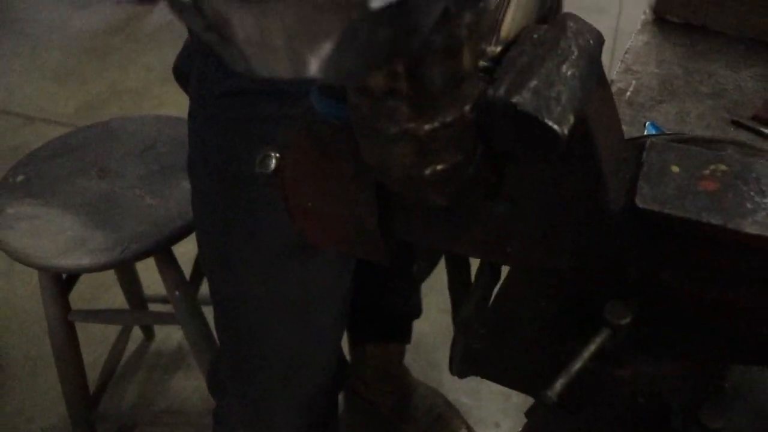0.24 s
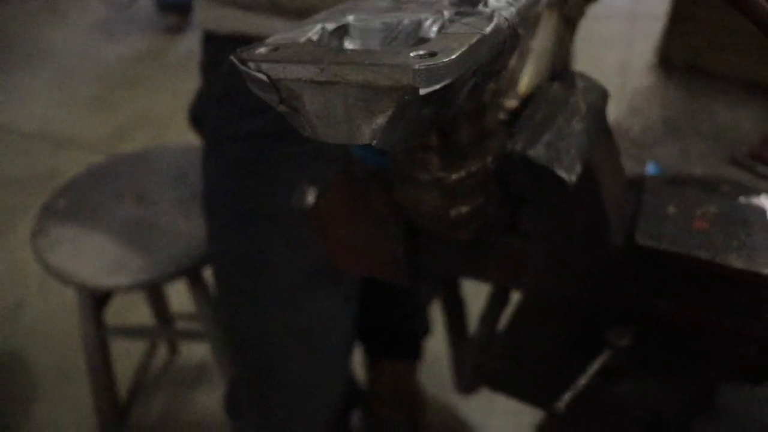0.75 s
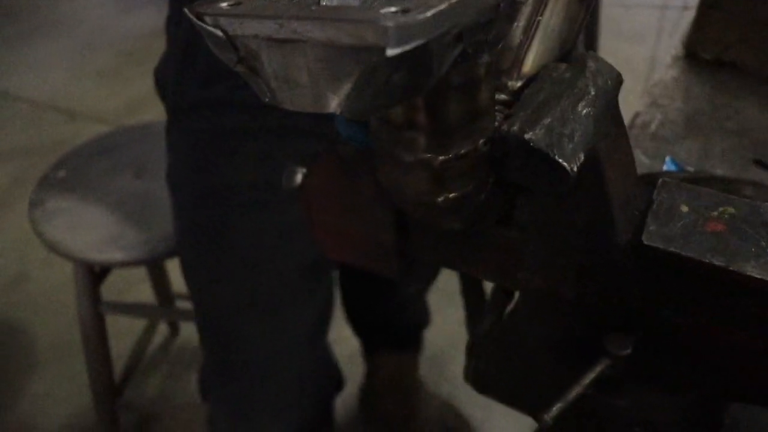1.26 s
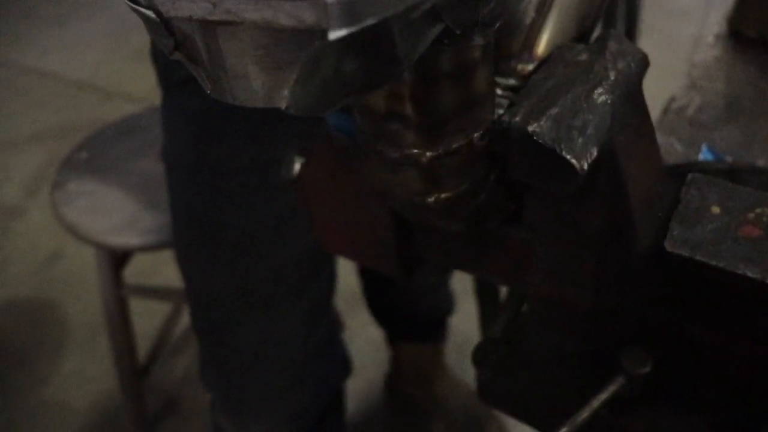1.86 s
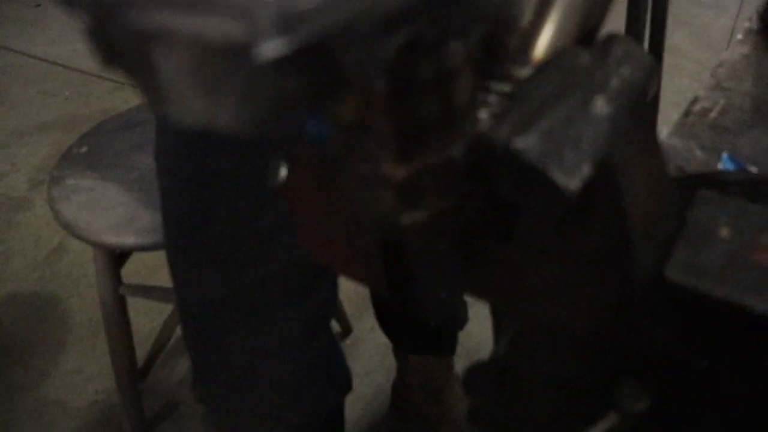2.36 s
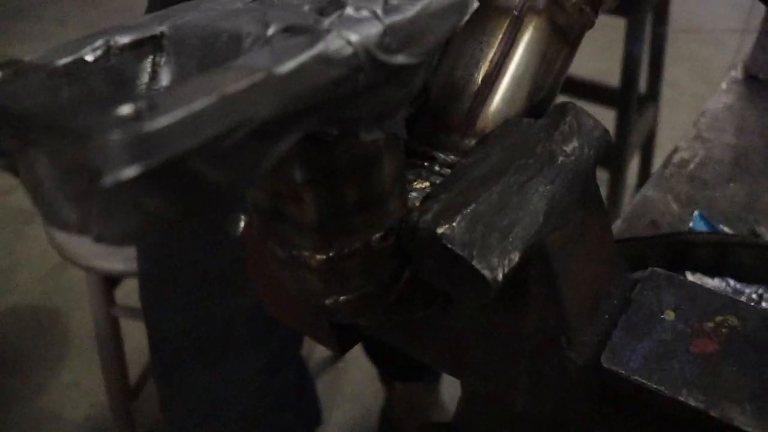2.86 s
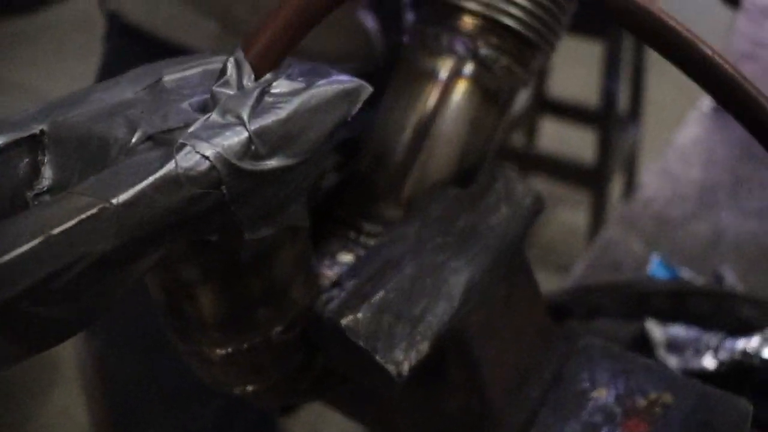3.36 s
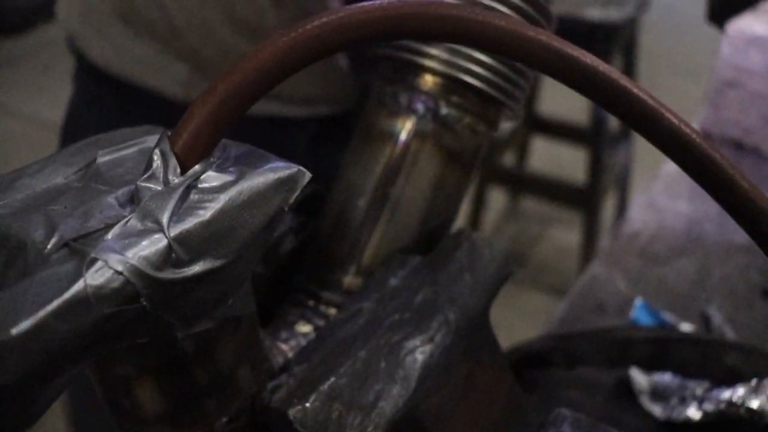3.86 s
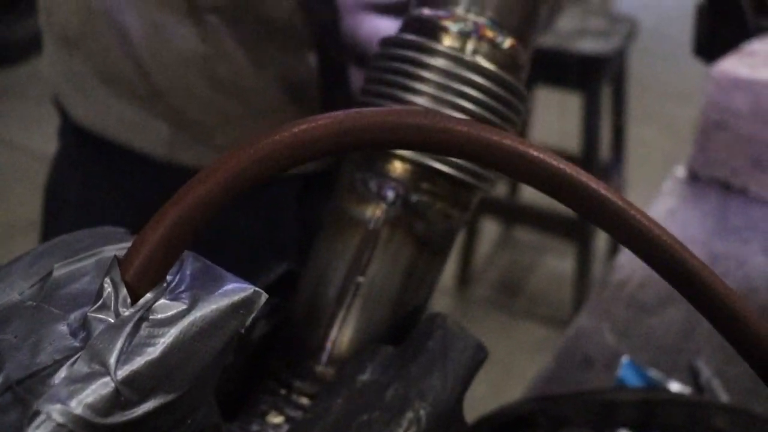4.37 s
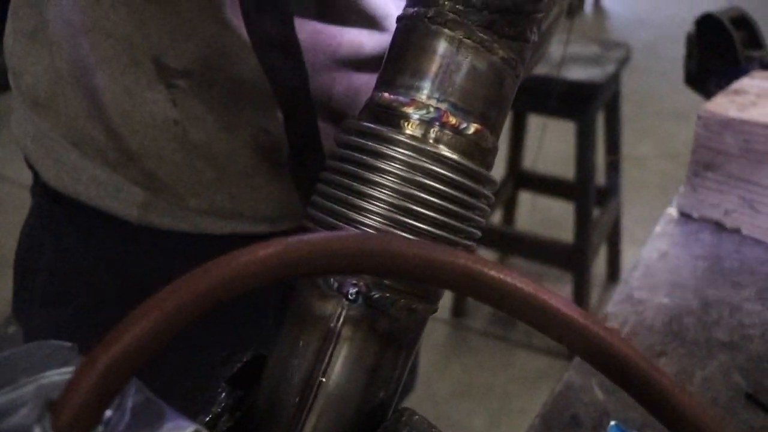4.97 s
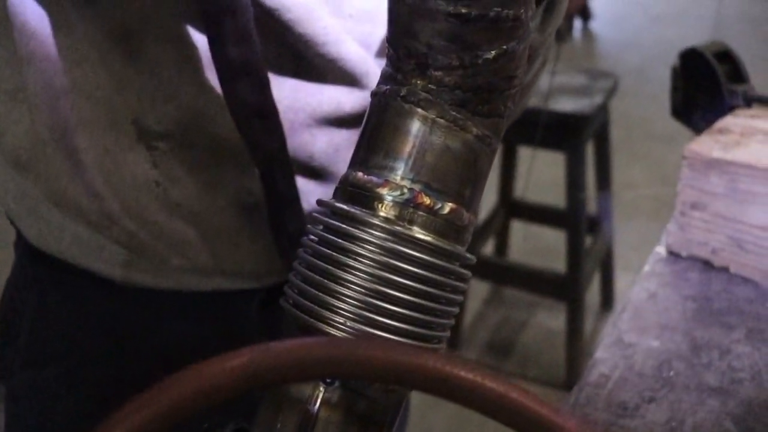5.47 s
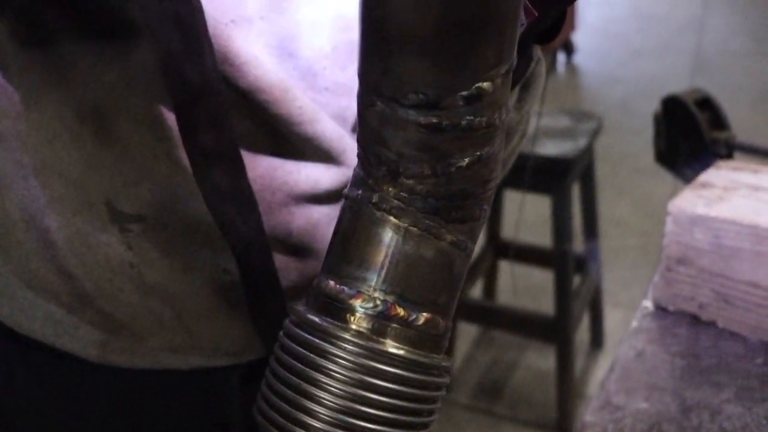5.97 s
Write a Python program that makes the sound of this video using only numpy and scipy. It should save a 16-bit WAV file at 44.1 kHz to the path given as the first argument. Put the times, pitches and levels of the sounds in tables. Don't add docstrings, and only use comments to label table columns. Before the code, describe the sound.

Low workshop machine hum with small clicks, then a loud harsh electrical buzz for a third of a second, followed by steady bright gas hiss.

```python
import sys
import numpy as np
from scipy import signal
from scipy.fft import rfft, irfft
from scipy.io import wavfile
from scipy.ndimage import uniform_filter1d, map_coordinates

SR = 44100
rng = np.random.default_rng(int(sys.argv[2]) if len(sys.argv) > 2 else 0)


def dump(signal):
    limited = np.clip(np.atleast_2d(signal).T, -1, 1)
    pcm = np.round(limited * 32767).astype(np.int16)
    wavfile.write(sys.argv[1], SR, pcm)


def magnitude_from_level(level_db):
    exponent = np.asarray(level_db, float) / 20
    return 10 ** exponent


N = 274302

# time_s, rise_db
FLARES = [(2.551, 2.5), (2.718, 2), (2.82, 1.5)]
# freq_hz, density_db_per_hz
GAS_FAR = [(1180, -24), (2000, -21), (2340, -7.5), (3270, 1), (4900, -22), (6080, -4.5), (8440, -4.5),
           (10600, -21), (12100, -6.5), (15700, -23)]
GAS_NEAR = [(1180, -14), (2000, 3), (2140, -20), (2570, -4.5), (3240, -0.5), (5340, -7.5), (9120, -2),
            (10100, -6.5), (13400, -12), (15700, -21)]
# time_s, closeness_0_to_1
NEARNESS = [(2.47, 0.84), (3.0, .65), (3.7, 0.43), (5.6, 0.92), (6.22, 1)]
# start_s, length_s, start_hz, level_db
GLINTS = [(2.96, 0.62, 6400, 6.5), (2.86, .5, 7700, 3), (2.9, .35, 12200, 5), (3.1, .35, 10100, 5),
          (3.3, 0.68, 8660, 8), (3.3, .65, 13500, 6), (3.3, .55, 11900, 4), (3.45, .45, 10000, 13),
          (3.5, .6, 7100, 8.5), (3.95, 0.53, 8700, 7.5), (4.2, 0.67, 6500, 9.5), (4.1, .6, 11400, 7),
          (4.15, .55, 12900, 6), (4.4, .5, 8850, 4), (4.7, .6, 13800, 7), (4.78, 1.15, 9530, 7),
          (4.85, .55, 8950, 5.5), (5.06, .8, 10900, 6), (5.6, .5, 6500, 5), (5.4, .55, 8900, 3),
          (5.5, .6, 13900, 6), (4.6, 1.4, 3830, 3), (5.75, 0.68, 3350, 5.5), (3, .55, 11000, -8),
          (4.9, .9, 10600, -9), (4.3, .7, 12100, -3), (3.9, 1.4, 15300, -5), (2.7, .2, 8800, -9)]
# extra_path_m, growth_m_per_s, share
ECHOES = [(.21, .012, 0.11), (.43, 0.0305, 0.12), (.66, .05, .2), (.95, 0.0586, .15)]
# freq_hz, level_db
TICK_COLOUR = [(1500, -28), (3000, 0.5), (5000, -1), (9000, 1.5), (10700, -5), (13000, -1), (16000, -5)]
# freq_hz, level_db, t60_s
HOSE_CLIP = [(13000, -2, .035), (8500, -8, 0.048)]
SWITCH_DOWN = [(2800, -1, .03), (3540, -1.5, 0.055), (6360, -7, .04), (9000, 1, 0.031)]
SWITCH_UP = [(3700, -1, 0.026), (4450, 1.5, 0.028), (4860, -4.5, .023), (6500, -16, .06), (8500, -7, .03),
             (13300, -8, .04)]
VALVE = [(2230, -4, 0.13), (4780, -2, .06), (6600, 0, 0.068), (13000, -6, 0.051)]
# time_s, peak_db, crack_to_ring_db
TAPS = [
    (HOSE_CLIP, [(.469, -55, 12), (.485, -64, 6), (.493, -51, 3), (.763, -55, -3), (1.763, -50, 9), (2.413, -40, 5)]),
    (SWITCH_DOWN, [(1.1635, -30, 5), (1.178, -38, 4)]),
    (SWITCH_UP, [(1.2208, -28, -1), (1.234, -35, 2)]),
    (VALVE, [(2.427, -48, -8), (2.4327, -29, 5)]),
]
# start_s, length_s, level_db
RUBS = [(1.755, 0.068, -48), (1.81, 0.063, -53.5), (1.872, 0.058, -51), (1.909, 0.077, -50.5)]
# time_s, change_db
LURCHES = [(.47, -11), (.85, -4), (1.9, 3), (2.2, -4.5), (4.9, 3), (5.85, -6)]
# start_s, length_s, level_db
WHINES = [(.03, 0.32, -47), (1.08, 1.8, -48.5), (3.068, 1.5, -43)]
# multiple, level_db
FAN_ORDERS = [(3, -44.5), (8, -56.5), (9, -60.5), (11, -70), (12, -54.5), (14, -64), (17, -72), (18, -64),
              (27, -69)]
# freq_hz, width_hz, level_db, steadiness_0_to_1
DRONES = [(120.6, 1.9, -49, 1), (225.6, 1.9, -56, 0.9), (459, 17, -45, 0.42), (603, 6.6, -59, 0.34),
          (4045, 19, -67.5, 0.34)]
# freq_hz, density_db_per_hz
SHOP_COLOUR = [(20, -34), (60, -32.5), (95, -32), (135, -9), (200, -15.5), (270, -14), (330, -9.5),
               (480, -11.5), (620, -13.5), (1350, -20.5), (1600, -23), (4000, -37.5), (7100, -41),
               (16000, -60)]
# freq_hz, width_hz, level_db
SHOP_HOLLOWS = [(377, 41, -47), (414, 46, -46.5), (488.7, 26, -50), (1320, 204, -50.5)]
# freq_hz, density_db_per_hz
STAGE_HISS = [(7000, -25), (9500, -2), (11000, 0), (16000, 0)]

MAINS_HZ, MAINS_ZERO_S, STARTER_ON_S, STARTER_OFF_S = 59.95, 2.5306, 2.5306, 2.9058
POINTED = 0.5
WEAK_DB, COLD_DB, WARM_S = -11, -28, 0.028
FLARE_S = 0.015
VALVE_S, FLOW_DB, SURGE_DB, SURGE_S = 2.4325, -50.5, 12.5, 0.97
GLINT_SLIDE_PER_S, GLINT_WIDTH_HZ = 0.068, 190
PUMP_HZ, FAN_HZ, WHINE_HZ = 75.95, 116.8, 1372
SECOND_DB, SECOND_SWAY_DB, LURCH_S = -39, 0.93, 0.053
FOURTH_DB, FOURTH_SWAY_DB, FOURTH_SINK_DB_PER_S = -39, 2, -2.5
WHINE_RISE_S, WHINE_FADE_DB, WHINE_IDLE_DB = 0.036, -10, -65
RUMBLE_SINK_DB_PER_S = -0.44
STAGE_DB, EDGE_HZ = -78, 15800


def evened(x):
    return x / np.sqrt(np.mean(x ** 2) + 1e-20)


def read(points, hz):
    f, value = np.transpose(points)
    return np.interp(np.log(hz + 1), np.log(f + 1), value)


def drift(hz):
    low_pass = signal.butter(2, hz, fs=SR, output="sos")
    return evened(signal.sosfilt(low_pass, rng.standard_normal(N + SR))[SR:])


def wavering(hz, width_hz, clean):
    swing = clean + (1 - clean) * (drift(width_hz / 2) + 1j * drift(width_hz / 2))
    return evened((swing * np.exp(2j * np.pi * hz * np.arange(N) / SR)).real)


def airy(colour_db, patchy_db, wide_bins, long_frames, slide_per_s=0):
    frames, hz = N // 256 + 5, np.fft.rfftfreq(1024, 1 / SR)
    s = np.arange(frames) * 256 / SR
    real, imag, patches = rng.standard_normal((frames, 513, 3)).T
    for _ in range(2):
        patches = uniform_filter1d(patches, max(int(wide_bins), 1), 0)
        patches = uniform_filter1d(patches, max(int(long_frames), 1), 1)
    place, frame = np.meshgrid(np.arange(513), np.arange(frames), indexing="ij")
    moved = [place * np.exp(slide_per_s * s), frame]
    patches = evened(map_coordinates(patches, moved, order=1, mode="mirror"))
    field_db = colour_db(hz, s) + patchy_db * (patches - 0.13 * patches ** 2)
    spectra = (real + 1j * imag) * magnitude_from_level(field_db)
    return evened(signal.istft(spectra, nperseg=1024, noverlap=768)[1][:N])


def starter(t):
    sine = np.sin(2 * np.pi * MAINS_HZ * (t - MAINS_ZERO_S))
    volts = (1 - POINTED) * sine + POINTED * np.arcsin(sine) * 2 / np.pi
    enough = (abs(volts) > 0.27) | (t < STARTER_ON_S + 0.002)
    live = (t > STARTER_ON_S) & (t < STARTER_OFF_S) & enough
    gap_db = 1.7 * np.tanh(drift(2500)) + 0.9 * drift(50)
    charge = 0.985 + np.cumsum(4950 * abs(volts) * live * magnitude_from_level(-gap_db)) / SR
    at = np.flatnonzero(np.diff(np.floor(charge)))
    late = (charge[at + 1] % 1) / (charge[at + 1] - charge[at])

    flare_db = sum(db * np.exp(-((t[at] - s) / FLARE_S) ** 2) for s, db in FLARES)
    weak_db = WEAK_DB + COLD_DB * np.exp(-(t[at] - STARTER_ON_S) / WARM_S)
    weak_db = (volts[at] < 0) * (weak_db + 2.5 * drift(61)[at])
    chance_db = 3.44 * np.tanh(rng.standard_normal(N)[at])
    size = magnitude_from_level(flare_db + 0.81 * gap_db[at] + chance_db + weak_db)
    sparks = np.zeros(N + 16)
    for k in range(-7, 9):
        sparks[at + 1 + k] += size * np.sinc(k + late) * np.cos(np.pi * (k + late) / 18) ** 2

    u = np.arange(400) / SR
    snap = (u == 0) + 0.3 * np.exp(-u / 0.00018)
    keep = np.exp(-1 / (0.0021 * SR))
    lumps = signal.lfilter([1 - keep], [1, -keep], sparks)[:N]
    return magnitude_from_level(-17.0) * np.convolve(sparks, snap)[:N] + magnitude_from_level(18.5) * lumps


def low_cut(x, *corners_hz):
    for hz in corners_hz:
        x = signal.lfilter(*signal.butter(1, hz, "high", fs=SR), x)
    return x


def gas(t):
    def colour_db(hz, s):
        near = np.clip(np.interp(s, *np.transpose(NEARNESS)), 0, 1)
        field = np.outer(read(GAS_FAR, hz), 1 - near) + np.outer(read(GAS_NEAR, hz), near)
        for start, length, from_hz, db in GLINTS:
            part = np.clip((s - start) / length, 0, 1)
            centre_hz = from_hz * (1 - GLINT_SLIDE_PER_S * length * part)
            off = (hz[:, None] - centre_hz) / GLINT_WIDTH_HZ
            field += db * np.sin(np.pi * part) ** 0.21 * np.exp(-off ** 2)
        paths = 1
        for extra_m, growth, share in ECHOES:
            delay_s = (extra_m + growth * (s - VALVE_S)) / 343
            paths = paths + share * np.exp(-2j * np.pi * np.outer(hz, delay_s))
        return field + 20 * np.log10(abs(paths) + 0.01)

    opened = np.clip((t - VALVE_S) / 0.0022, 0, 1)
    flow_db = FLOW_DB + SURGE_DB * np.exp(-abs(t - VALVE_S) / SURGE_S)
    return magnitude_from_level(flow_db) * opened * airy(colour_db, 3.3, 5, 32, slide_per_s=0.09)


def taps():
    hz = np.fft.rfftfreq(8192, 1 / SR)
    u, out = np.arange(8192) / SR, np.zeros(N + 8192)
    for rings, ticks in TAPS:
        for s, db, crack_db in ticks:
            noise = rng.standard_normal(8192)
            crack = magnitude_from_level(crack_db) * evened(irfft(rfft(noise) * magnitude_from_level(read(TICK_COLOUR, hz))))
            sound = crack * (magnitude_from_level(-60 * u / rings[-1][2]) + magnitude_from_level(-32 - 60 * u / 0.2))
            rattle_s = np.cumsum(1 + 0.22 * uniform_filter1d(noise, 20)) / SR
            for ring_hz, ring_db, t60_s in rings:
                ring = np.sqrt(2) * np.sin(2 * np.pi * ring_hz * rattle_s)
                sound = sound + ring * magnitude_from_level(ring_db - 60 * u / t60_s)
            out[round(s * SR):][:8192] += magnitude_from_level(db - 8.0) * np.minimum(u / 0.00062, 1) * sound
    return out[:N]


def rustle(t):
    colour = [(1500, -8), (4500, 0), (9000, -7.5), (11000, -19), (16000, -22)]  # freq_hz, level_db
    grainy = magnitude_from_level(1.8 * drift(60))
    rub = airy(lambda hz, s: read(colour, hz)[:, None], 2.5, 12, 3.5)
    push = 0
    for s, length, db in RUBS:
        push = push + magnitude_from_level(db) * np.sin(np.pi * np.clip((t - s) / length, 0, 1)) ** 2
    return push * grainy * rub


def pump(t):
    lurch_db = sum(db * np.exp(-((t - s) / LURCH_S) ** 2) for s, db in LURCHES)
    second_db = SECOND_DB + SECOND_SWAY_DB * drift(5.6) + lurch_db
    fourth_db = FOURTH_DB + FOURTH_SINK_DB_PER_S * t + FOURTH_SWAY_DB * drift(4.4)
    shaft = magnitude_from_level(-48.5 - 0.63 * t) * np.sin(2 * np.pi * PUMP_HZ * t)
    second = magnitude_from_level(second_db) * wavering(2 * PUMP_HZ, 3.0, 0.95)
    fourth = magnitude_from_level(fourth_db) * wavering(4 * PUMP_HZ, 6.6, 0.82)
    return shaft + second + fourth


def motor_whine(t):
    load = magnitude_from_level(WHINE_IDLE_DB)
    for s, length, db in WHINES:
        rise = np.clip((t - s) / WHINE_RISE_S, 0, 1) * (t < s + length)
        load = load + rise * magnitude_from_level(db + WHINE_FADE_DB * ((t - s) / length) ** 2)
    return magnitude_from_level(-4) * load * wavering(WHINE_HZ, 4.9, 0.93)


def fan():
    return sum(magnitude_from_level(db) * wavering(k * FAN_HZ, 2.76, 0.66) for k, db in FAN_ORDERS)


def drones():
    return sum(magnitude_from_level(db) * wavering(hz, width, min(steady, 1)) for hz, width, db, steady in DRONES)


def shop(t):
    rumble = airy(lambda hz, s: read(SHOP_COLOUR, hz)[:, None], 0.4, 8, 8.4)
    hollows = sum(magnitude_from_level(db) * wavering(hz, width, 0) for hz, width, db in SHOP_HOLLOWS)
    return magnitude_from_level(0.85 + RUMBLE_SINK_DB_PER_S * t) * (magnitude_from_level(-36.5) * rumble + hollows)


def scene():
    t = np.arange(N) / SR
    buzz = starter(t)
    air = gas(t) + taps() + rustle(t) + pump(t) + motor_whine(t) + fan() + drones() + shop(t)
    return air + np.array([low_cut(buzz, 27.8, 26, 5.9), low_cut(buzz, 24.5, 25.8, 5.6)])


def top_cut(x):
    return signal.sosfilt(signal.butter(12, 16830, fs=SR, output="sos"), x)


def record(dry):
    hiss = airy(lambda hz, s: read(STAGE_HISS, hz)[:, None], 0, 1, 1)
    noisy = dry + magnitude_from_level(STAGE_DB) * hiss * np.array([[1], [-1]])
    edge = signal.firwin(401, EDGE_HZ, window=("kaiser", 7), fs=SR)
    mix = signal.oaconvolve(noisy, edge[None], "same")
    return top_cut(mix)


dry = scene()
out = record(dry)
dump(out)
```